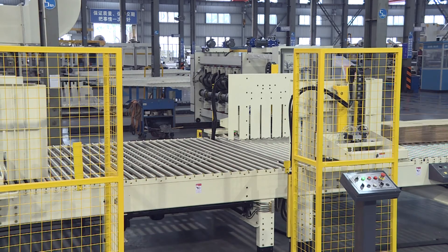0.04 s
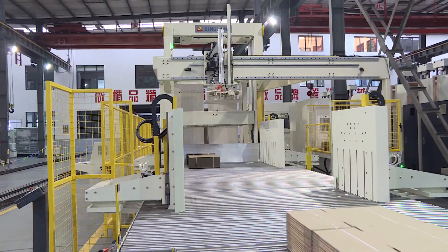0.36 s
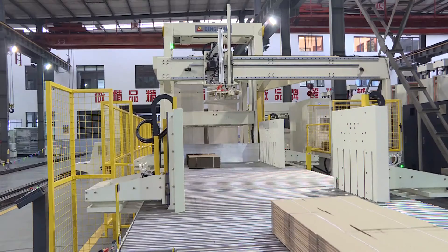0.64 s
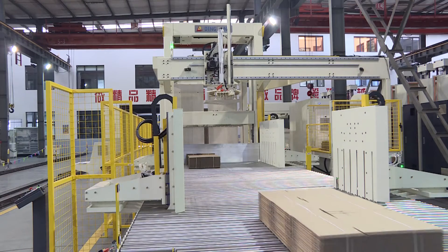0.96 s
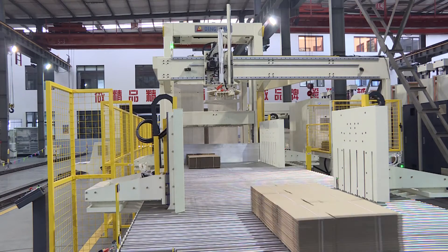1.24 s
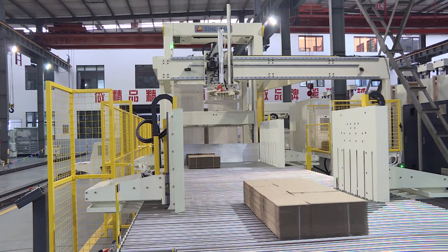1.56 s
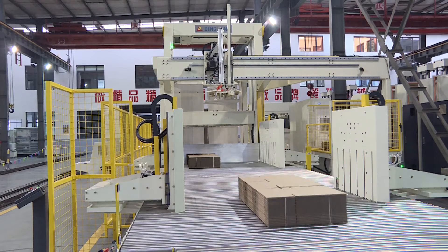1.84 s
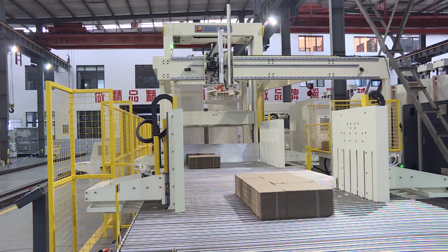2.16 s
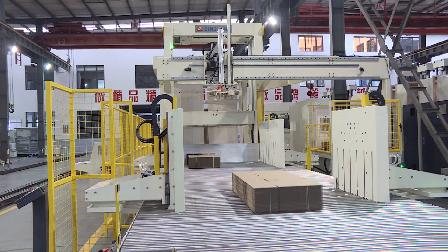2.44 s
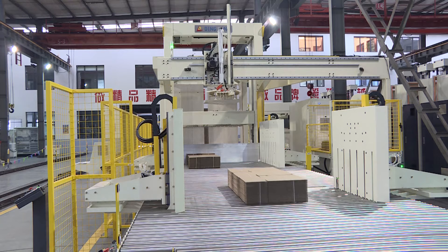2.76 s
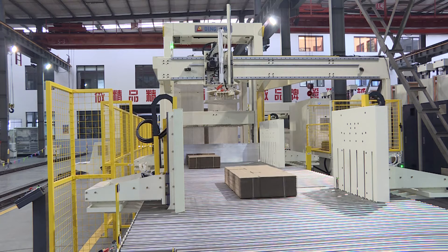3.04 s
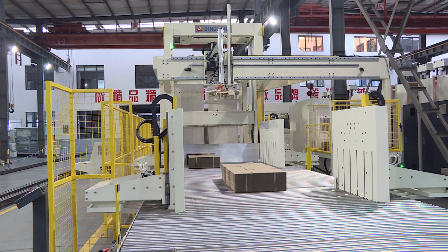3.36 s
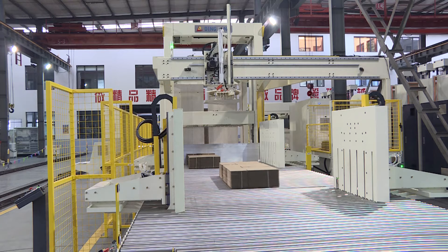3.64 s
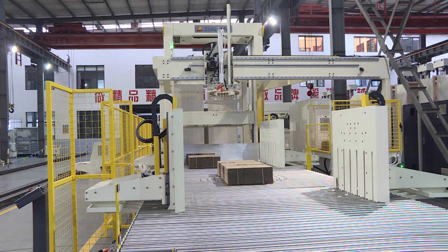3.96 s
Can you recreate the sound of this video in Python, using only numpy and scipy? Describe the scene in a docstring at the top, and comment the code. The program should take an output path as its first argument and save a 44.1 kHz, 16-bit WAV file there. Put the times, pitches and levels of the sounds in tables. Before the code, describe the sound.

A roller conveyor rumbles steadily, with hissing spurts and machinery clatter in a factory hall.

```python
"""A roller conveyor carries a bundle of cardboard through a large factory hall. From the start the rollers
rumble with the same knocks on every turn, over a steady hum, hall wash and hiss. Spurts of hiss and high
squeaks begin at once and recur. A thin whine is strongest from 0.7 to 1.7 s. Packaging machinery clatters from
0.9 to 2.1 s, with hard blows at first and taps that ring hollow parts. It clatters and taps again near 2.5 s
and from about 3.6 s; clatter and blows echo in the hall."""
import sys
import numpy as np
from scipy import signal
from scipy.fft import rfft, irfft, next_fast_len
from scipy.io import wavfile
from scipy.ndimage import uniform_filter1d, map_coordinates

SR = 44100
rng = np.random.default_rng(int(sys.argv[2]) if len(sys.argv) > 2 else 0)


def store_wav(level_fs):
    """Save 16-bit WAV to argv[1]."""
    pcm = np.round(np.clip(np.atleast_2d(level_fs), -1, 1) * 32767)
    wavfile.write(sys.argv[1], SR, pcm.T.astype(np.int16))


N = 176400


def amp(db):
    """Decibels to gain."""
    return 10 ** (np.asarray(db) / 20)


def unit(x):
    """Scale to rms 1."""
    return x / np.sqrt(np.mean(x ** 2) + 1e-20)


def along(points, hz):
    """Read (Hz, value) points on a log axis."""
    point_hz, values = np.transpose(points)
    return np.interp(np.log(hz + 1), np.log(point_hz + 1), values)


def clock():
    """Sample times in seconds."""
    return np.arange(N) / SR


def curve(rows):
    """Read (seconds, value) points at every sample."""
    return np.interp(clock(), *np.transpose(rows))


def wobble(rate_hz):
    """Smooth random curve, rate_hz knots a second."""
    knots = rng.standard_normal(int(N * rate_hz / SR) + 4)
    return map_coordinates(knots, [np.arange(N) * rate_hz / SR])


def envelope(start_s, rise_s, hold_s, t60_s):
    """Linear rise; exponential release from hold_s after the start."""
    t = clock() - start_s
    return np.clip(t / rise_s, 0, 1) * amp(-60 * np.maximum(t - hold_s, 0) / t60_s)


def filtered(x, response):
    """Apply a gain given as a function of Hz."""
    size = next_fast_len(N + SR // 2)
    return irfft(rfft(x, size) * response(np.fft.rfftfreq(size, 1 / SR)), size)[..., :N]


# Stereo width; the channels are opposed in the top treble. Each row: frequency in Hz, side over mid in dB.
WIDTH = [(60, -48), (170, -67), (380, -52), (700, -40), (1300, -72), (1750, -63), (2050, -32),
         (2400, -11.5), (3200, -8.5), (4050, -6), (4800, -20.5), (6000, -16), (7200, -6), (8150, -4),
         (8800, -4), (9600, 4), (11000, 6), (12700, 10.5), (16000, 9.5)]
def stereo(pair, spectrum, wider_db=0):
    """Colour two unrelated signals as mid and side; return left and right, rms 1."""
    def response(hz):
        angle = np.arctan(amp(along(WIDTH, hz) + wider_db))
        return amp(along(spectrum, hz)) * np.array([np.cos(angle), np.sin(angle)])
    mid, side = filtered(pair, response)
    return unit(np.array([mid + side, mid - side]))


def rush(spectrum, patchy_db, wider_db=0):
    """Stereo noise, rms 1, with patches of random gain in time and frequency."""
    bins = signal.stft(rng.standard_normal((2, N)), nperseg=512)[2]
    patches = uniform_filter1d(rng.standard_normal(bins.shape[1:]), size=3, axis=0)
    patches = uniform_filter1d(patches, size=6, axis=1)
    noise = signal.istft(bins * amp(patchy_db * unit(patches)), nperseg=512)[1][:, :N]
    return stereo(noise, spectrum, wider_db)


def echoes(x, t60s):
    """Diffuse tail; each frequency dies at its own speed."""
    hz, t, bins = signal.stft(rng.standard_normal(SR), SR, nperseg=256)
    decay = amp(-60 * t / along(t60s, hz)[:, None])
    tail = signal.istft(bins * decay, SR, nperseg=256)[1]
    return signal.fftconvolve(x, tail[None] / np.linalg.norm(tail), axes=1)[:, :N]


# Rumble of the roller surfaces. Each row: frequency in Hz, relative density in dB.
RUMBLE_SPECTRUM = [(20, -30), (38, -22), (54, -9), (72, -21), (105, -5), (180, -3.5), (280, -2),
                   (460, -4.5), (650, -11.5), (1000, -17), (1250, -15.5), (1750, -13), (2100, -21.5),
                   (2600, -36.5), (5000, -66)]
# Knocks of one turn. Each row: time into the turn in seconds, pitch in Hz, peak level in dB.
KNOCKS = [(.0005, 203, -16.5), (.024, 417, -21), (.034, 400, -22.5), (.050, 190, -27), (.063, 347, -23.5),
          (.079, 151, -24.5), (.088, 240, -18.5), (.097, 170, -17), (.102, 420, -22.5), (.126, 209, -21.5),
          (.135, 323, -18), (.145, 171, -19), (.16, 159, -22.5), (.186, 98, -23)]
def rollers():
    """The same rough surface comes round on every turn; its dull knocks are never quite alike."""
    turn_s, rumble_db = .220867, -26.5
    rise_s, t60_s = .0014, .031
    scatter_db, slip_s, detune_ratio = 1.9, .00033, .009  # spread from turn to turn
    size = round(turn_s * SR)
    one_turn = irfft(np.exp(2j * np.pi * rng.random((2, size // 2 + 1))), size)
    surface = one_turn[:, np.arange(N) % size]
    knocks, t = np.zeros(N + SR), np.arange(size) / SR
    shape = amp(-60 * t / t60_s) * (1 - np.exp(-t / rise_s))
    for turn_start_s in np.arange(0, N / SR, turn_s):
        for offset_s, hz, db in KNOCKS:
            strength, slip, detune = rng.standard_normal(3)
            ring = shape * np.sin(2 * np.pi * hz * (1 + detune_ratio * detune) * t)
            onset = round(abs(turn_start_s + offset_s + slip_s * slip) * SR)
            knocks[onset:][:size] += amp(db + scatter_db * strength) * ring / np.abs(ring).max()
    return knocks[:N] + amp(rumble_db) * stereo(surface, RUMBLE_SPECTRUM)


def tone(hz, rms_db, waver_db):
    """Sine, slightly unsteady in level and phase."""
    peak = np.sqrt(2) * amp(rms_db + waver_db * wobble(4.99))
    phase = 2 * np.pi * (hz * clock() + rng.random())
    drift_rad = .47 * wobble(6.06)
    return peak * np.sin(phase + drift_rad)


# Steady hum tones; several (54.2, 154, 167.5, 257.5, 452.8 Hz) lie on harmonics of the roller turn. Each row:
# frequency in Hz, rms level in dB.
HUM_TONES = [(49.8, -41), (54.2, -40.5), (99.5, -35), (154, -43), (167.5, -36), (257.5, -44.5),
             (452.8, -40), (584, -43.5), (695.8, -46), (815, -47), (1192.8, -50), (1222.5, -43),
             (1283, -48.5), (1630.5, -44.5), (2036, -49.5), (4495, -60)]
def hum():
    """Steady tones hum at fixed pitches, several at whole multiples of the roller turn, each tone wavering on
    its own."""
    return sum(tone(hz, db, waver_db=2.5) for hz, db in HUM_TONES)


# Swell of the whine. Each row: time in seconds, rms level in dB.
WHINE_LEVEL = [(0, -59), (.12, -57), (.19, -47), (.29, -52), (.4, -62), (.6, -55), (.69, -45), (.84, -43.5),
               (.9, -47), (1.13, -45), (1.25, -44), (1.4, -43.5), (1.47, -52), (1.56, -44), (1.68, -43.5),
               (1.74, -59), (2.7, -53), (3.3, -62), (4, -57)]
def whine():
    """One thin motor tone comes and goes."""
    return tone(hz=2855.3, rms_db=curve(WHINE_LEVEL), waver_db=1.5)


# Wash of the hall. Each row: frequency in Hz, relative density in dB.
WASH_SPECTRUM = [(15, -25), (27, -11), (40, -5), (55, -1), (85, -2), (200, -0.5), (420, -3), (700, -5),
                 (1050, -8.5), (1650, -6), (2050, -11), (2300, -20.5), (2650, -21.5), (3500, -25),
                 (6000, -42)]
def hall_wash():
    """Distant machines blend into an even noise."""
    level_db = -26 + .17 * wobble(12)
    return amp(level_db) * rush(WASH_SPECTRUM, patchy_db=1.5)


# Colour of the hiss. Each row: frequency in Hz, relative density in dB.
HISS_SPECTRUM = [(1500, -43), (2600, -12.5), (3300, -8.5), (4200, 0), (5500, 0.5), (6500, -1), (7200, -3),
                 (8100, -5.5), (9100, -10), (9700, -6.5), (10400, -10), (11000, -9), (12500, -10),
                 (14800, -9.5), (16000, -14)]
# Course of the hiss. Each row: time in seconds, rms level in dB.
HISS_LEVEL = [(0, -38), (.55, -36), (1.3, -35.5), (1.8, -35.5), (2.2, -38), (2.35, -37), (2.8, -36.5),
              (3.05, -36.5), (3.24, -39), (3.4, -38), (4, -34)]
def line_hiss():
    """The line hisses throughout, drifting a few dB."""
    level_db = curve(HISS_LEVEL) + .6 * wobble(9.1)
    return amp(level_db) * rush(HISS_SPECTRUM, patchy_db=1.24)


# Body and top bands of a spurt. Each row: frequency in Hz, relative density in dB.
SPURT_BODY_SPECTRUM = [(1500, -35), (2600, -6.5), (4200, -0.5), (5600, -2), (7200, 3), (8200, 1.5),
                       (9500, -10), (11000, -5), (16000, -35)]
SPURT_TOP_SPECTRUM = [(5000, -40), (8500, -9), (9700, 0), (10400, -10), (11000, -4.5), (11700, -3.5),
                      (12700, 1), (14000, -2), (16000, -5)]
# Spurts of hiss. Each row: start in seconds, hold in seconds, body level in dB, top level in dB.
SPURTS = [(.01, 0.057, -43, -43), (.21, 0.083, -51, -40), (.46, 0.077, -39.5, -50),
          (0.602, 0.12, -43, -39.5), (0.807, 0.052, -34, -35), (0.867, 0.1, -30.5, -34.5),
          (.98, 0.082, -37, -39.5), (1.095, 0.038, -30.5, -36), (1.43, 0.1, -37.5, -35.5),
          (1.543, 0.037, -31, -40), (1.62, .04, -36, -37), (1.668, 0.018, -27.5, -36),
          (1.76, 0.027, -37.5, -50), (1.85, 0.046, -38, -40), (1.894, 0.1, -31, -34.5),
          (2.253, 0.024, -35, -37), (2.453, 0.023, -33, -31), (2.499, 0.047, -38, -35),
          (2.58, 0.31, -41.5, -41), (3.292, 0.04, -39, -44), (3.43, 0.032, -47, -46),
          (3.607, 0.074, -34, -34.5), (3.69, 0.084, -29.5, -33.5), (3.78, 0.084, -39, -39),
          (3.897, 0.026, -29.5, -33)]
def spurts():
    """Short hisses, probably air from the valves, each with its own brightness."""
    shapes = np.array([envelope(start_s, rise_s=.014, hold_s=hold_s, t60_s=.27)
                       for start_s, hold_s, _, _ in SPURTS])
    gains = amp(np.array(SPURTS)[:, 2:].T)
    body_gain, top_gain = np.sqrt(gains ** 2 @ shapes ** 2)  # overlaps add in power
    body = body_gain * rush(SPURT_BODY_SPECTRUM, patchy_db=2.5, wider_db=2.5)
    return body + top_gain * rush(SPURT_TOP_SPECTRUM, patchy_db=0)


# High squeaks. Each row: start and length in seconds, first and last pitch in Hz, level in dB.
SQUEAKS = [(.010, .009, 14200, 12500, -37), (.026, .011, 14200, 15800, -30),
           (.038, .013, 14400, 12800, -37), (.066, .016, 15400, 13200, -37),
           (0.65, .012, 13650, 14250, -32), (.658, .015, 14300, 12500, -33),
           (.688, .026, 13550, 13350, -35), (2.486, .023, 15600, 13900, -35),
           (2.516, .011, 14200, 13600, -32)]
def squeaks():
    """Quick rough glides; they reach left and right out of step, each side with its own echoes."""
    rough_rad, rough_hz, left_lag_rad = .95, 1300, 2.3
    echo_db, echo_t60_s = -4, .19
    chirps, t = np.zeros(N, complex), clock()
    for start_s, length_s, first_hz, last_hz, db in SQUEAKS:
        hz = np.interp(t, [start_s, start_s + length_s], [first_hz, last_hz])
        phase = 2 * np.pi * np.cumsum(hz) / SR
        progress = np.clip((t - start_s) / length_s, 0, 1)
        swell = np.sqrt(np.abs(np.sin(np.pi * progress)))
        chirps += np.sqrt(2) * amp(db) * swell * np.exp(1j * phase)
    chirps *= np.exp(1j * rough_rad * wobble(rough_hz))
    direct = np.real([chirps * np.exp(-1j * left_lag_rad), chirps])
    tails = np.vstack([echoes(channel[None], [(0, echo_t60_s)]) for channel in direct])
    return direct + amp(echo_db) * tails


# Hard clack and dull frame thud. Each row: frequency in Hz, relative density in dB.
CLACK_SPECTRUM = [(150, -43), (450, -18), (700, 3), (1000, 2), (1350, 0), (1900, -1), (2400, -12),
                  (3000, -22), (4500, -18.5), (8000, -34), (16000, -21)]
THUD_SPECTRUM = [(30, -26), (100, 1), (180, 1), (260, 4), (350, 5), (620, -2.5), (950, -32), (2500, -70)]
# Rattles of the machinery. Each row: start, rise and hold in seconds, clack and thud levels in dB.
RATTLES = [(0.873, .0005, 0.016, -21.5, -18), (.902, 0.0037, 0.013, -20, -20),
           (0.923, 0.0054, 0.037, -25, -23), (.973, 0.0054, 0.018, -37, -22.5),
           (1.101, 0.01, 0.028, -19.5, -26), (1.55, .015, 0.037, -29, -37), (1.745, 0.014, .052, -22, -28),
           (1.815, 0.025, 0.11, -27, -40), (1.928, 0.0062, 0.019, -21, -46), (1.95, .01, 0.059, -25.5, -30),
           (2.055, 0.0076, 0.025, -25, -51), (2.474, 0.0037, 0.021, -30, -27),
           (3.665, 0.015, 0.038, -24.5, -25), (3.722, 0.011, 0.026, -23.5, -31),
           (3.775, .008, 0.03, -27.5, -28), (3.843, 0.004, 0.035, -32, -25), (3.904, .008, 0.025, -21, -21)]
def clatter():
    """Quick rattles of contacts: a hard clack over a dull thud of the frame."""
    contacts_per_s = 3500
    shapes = np.array([envelope(start_s, rise_s, hold_s, t60_s=.05)
                       for start_s, rise_s, hold_s, _, _ in RATTLES])
    gains = amp(np.array(RATTLES)[:, 3:].T)
    clack_gain, thud_gain = np.sqrt(gains ** 2 @ shapes ** 2)
    clicks = (rng.random(N) < contacts_per_s / SR) * rng.choice([-1, 1], (2, N))
    contacts = unit(clicks) + .5 * rng.standard_normal((2, N))
    clack = clack_gain * stereo(contacts, CLACK_SPECTRUM, wider_db=5)
    return clack + thud_gain * stereo(contacts, THUD_SPECTRUM)


# Light taps. Each row: start in seconds, pitch in Hz, hold in seconds, level in dB.
TAPS = [(0.873, 210, 0.014, -15), (0.9, 521, .012, -18.5), (1.112, 339, .015, -19.5),
        (1.113, 631, .01, -19), (1.555, 1920, .006, -23), (1.937, 832, .006, -23),
        (2.472, 820, 0.013, -20.5), (2.478, 461.3, 0.014, -19.5), (3.545, 1352, .015, -25),
        (3.672, 475, 0.015, -16.5), (3.724, 1800, .008, -22), (3.908, 335, .015, -18)]
def taps():
    """Each tap rings one slightly unsteady mode of a hollow part."""
    rings = np.zeros(N)
    for start_s, hz, hold_s, db in TAPS:
        shape = envelope(start_s, rise_s=.0083, hold_s=hold_s, t60_s=.12)
        drift_rad = .52 * wobble(120)
        rings += amp(db) * shape * np.sin(2 * np.pi * hz * clock() + drift_rad)
    return rings


# Bright snap of a blow. Each row: frequency in Hz, relative density in dB.
SNAP_SPECTRUM = [(1500, -15), (2600, 0), (4500, 0), (7000, -7), (10000, -7), (14000, -9), (16000, -12)]
# Blows within the clatter. Each row: start in seconds, clack level in dB, snap level in dB.
BLOWS = [(0.8738, -11.5, -23.5), (0.8818, -20, -20), (0.9032, -16, -38), (0.997, -13, -40)]
def blows():
    """Single hard contacts: a short clack with a bright snap."""
    shapes = np.array([envelope(start_s, rise_s=.00044, hold_s=.0012, t60_s=.019)
                       for start_s, _, _ in BLOWS])
    clack_gain, snap_gain = amp(np.array(BLOWS)[:, 1:].T) @ shapes
    clack = clack_gain * stereo(rng.standard_normal((2, N)), CLACK_SPECTRUM)
    return clack + snap_gain * stereo(rng.standard_normal((2, N)), SNAP_SPECTRUM)


# Reverberation of the hall. Each row: frequency in Hz, T60 in seconds.
HALL_T60 = [(100, 0.97), (1000, 0.87), (5000, 0.84), (16000, 0.37)]
def scene():
    """Conveyor, machines and hall together; clatter and blows feed the hall's echoes."""
    echo_db = -9.5
    steady = rollers() + hum() + whine() + hall_wash() + line_hiss()
    impacts = clatter() + blows()
    return steady + spurts() + squeaks() + taps() + impacts + amp(echo_db) * echoes(impacts, HALL_T60)


# Channel balance. Each row: frequency in Hz, left over right in dB.
BALANCE = [(2000, 0), (2700, 1.5), (3500, 0), (7000, 0), (8400, 0.5), (9300, 3.5), (10200, -1.3),
           (16000, 0.5)]
def record(dry):
    """The left side is a little brighter; the deepest bass and the highest treble are cut."""
    low_hz, top_hz = 14, 15850
    def response(hz):
        balance = amp(along(BALANCE, hz) * np.array([[.5], [-.5]]))
        high_pass = hz ** 2 / np.hypot(hz ** 2, low_hz ** 2)
        return balance * high_pass * (hz < top_hz)
    return filtered(dry, response)


dry = scene()
out = record(dry)
store_wav(out)
```